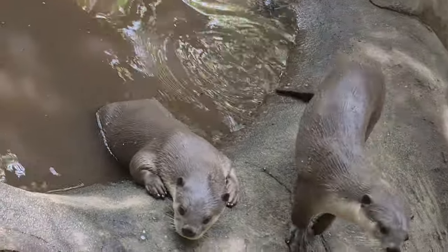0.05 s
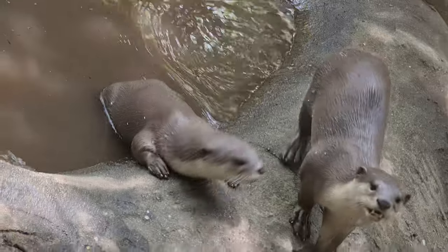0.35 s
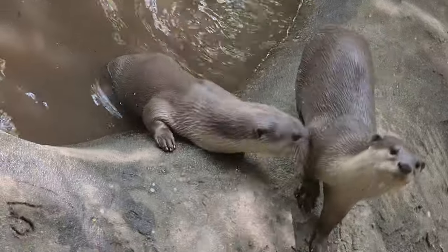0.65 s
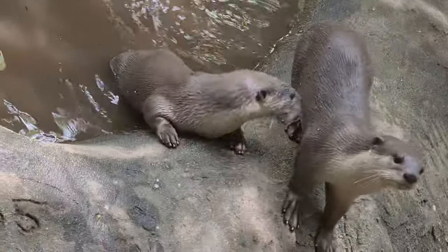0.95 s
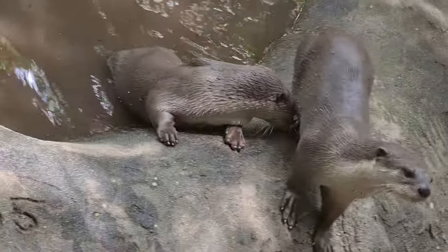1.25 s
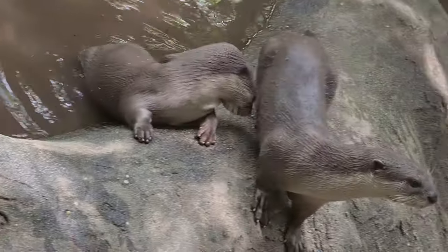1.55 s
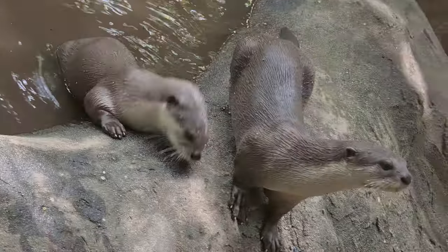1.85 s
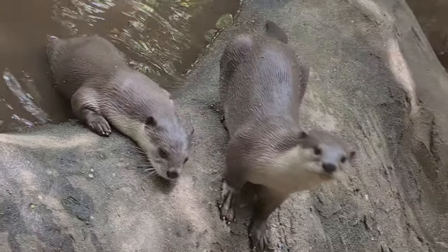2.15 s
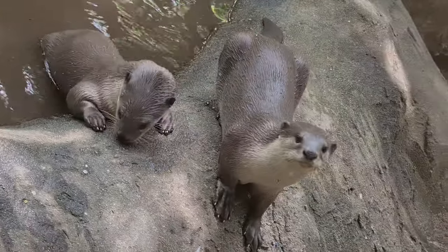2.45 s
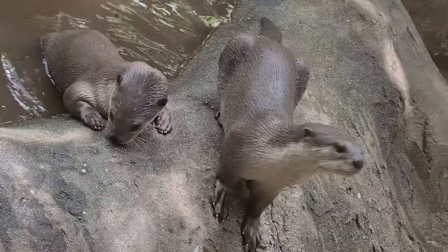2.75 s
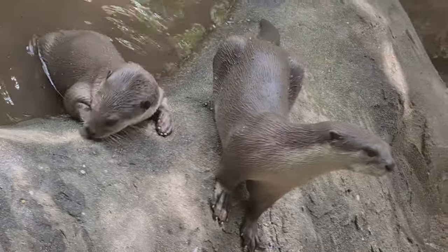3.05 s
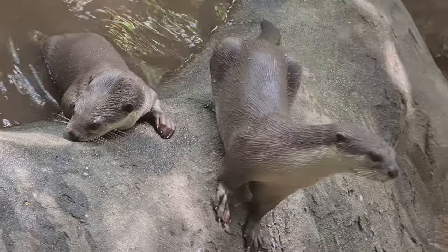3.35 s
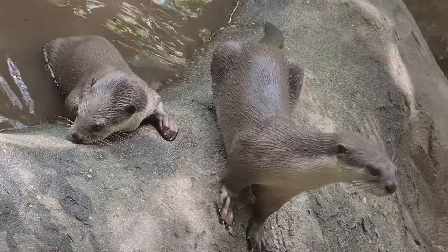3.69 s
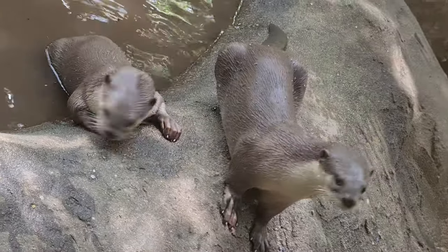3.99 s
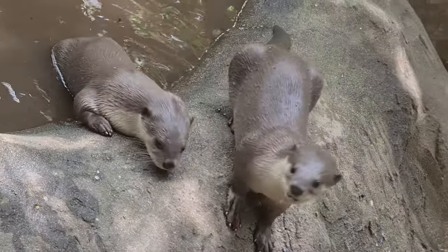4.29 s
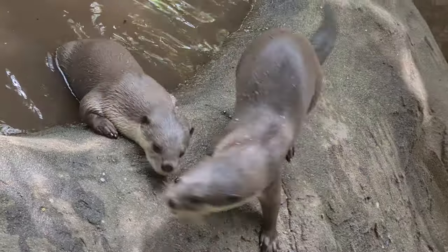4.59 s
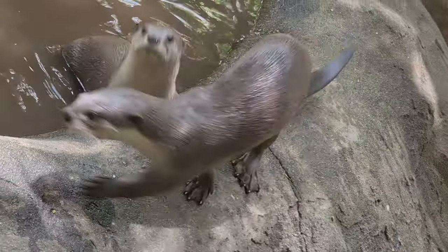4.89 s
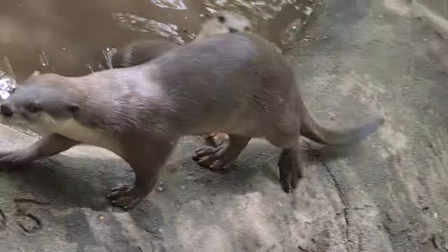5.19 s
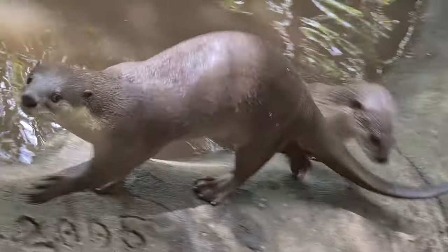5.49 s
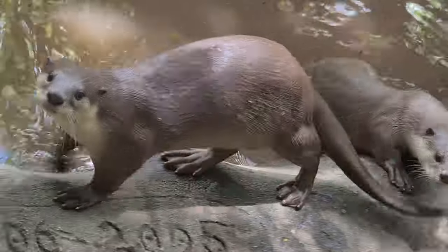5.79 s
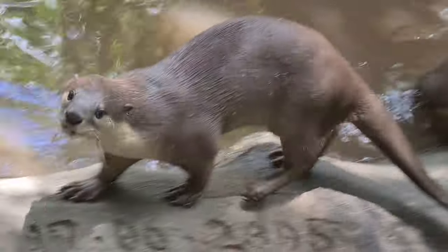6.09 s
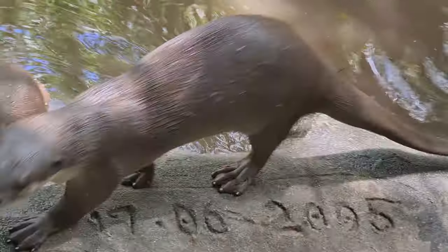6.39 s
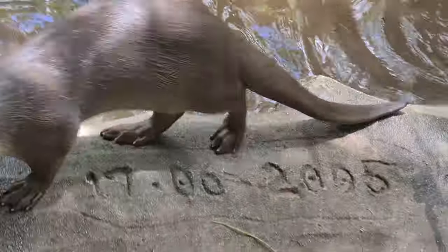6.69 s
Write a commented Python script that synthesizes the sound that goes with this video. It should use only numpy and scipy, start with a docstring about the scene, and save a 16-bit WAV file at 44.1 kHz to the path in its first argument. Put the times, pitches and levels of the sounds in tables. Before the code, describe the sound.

High, plunging otter chirps and brief squeaks come at intervals beside softly trickling water, with faint birds and paws padding on wet stone.

```python
"""Water trickles over a low hum; then, at the concrete pool edge, an otter whistles a high chirp that
plunges at the end. More chirps follow, with arched squeaks that flip register, short yips and faint
nasal-sounding whines. Paws pad on the wet stone and birds call farther off. A two-port microphone
stands close to the otters, and the walls of the enclosure ring briefly around it."""
import sys
import numpy as np
from scipy import signal
from scipy.fft import rfft, irfft
from scipy.io import wavfile
from scipy.ndimage import uniform_filter1d, minimum_filter1d

SR = 44100
rng = np.random.default_rng(int(sys.argv[2]) if len(sys.argv) > 2 else 0)


def generate_wav(sig):
    """Save sig (samples, or channels by samples) to the path in sys.argv[1] as 16-bit PCM at SR."""
    pcm = np.round(np.clip(np.atleast_2d(sig).T, -1, 1) * 32767).astype(np.int16)
    wavfile.write(sys.argv[1], SR, pcm)


N = 297234
EDGE_HZ = 15750  # top of the band


def amp(db):
    """Decibels to gain."""
    return 10 ** (np.asarray(db) / 20)


def unit(x):
    """Scales to rms 1."""
    return x / np.sqrt(np.mean(x ** 2) + 1e-20)


def ramp(x):
    """Holds a share between 0 and 1."""
    return np.clip(x, 0, 1)


def blend(a, b, share):
    """Moves from a to b as the share goes from 0 to 1."""
    return a + (b - a) * ramp(share)


def stages(*lengths):
    """Time through a call, and the progress 0-1 of each of its stages in turn."""
    t = np.arange(0, sum(lengths), 1 / SR)
    return t, [ramp((t - end) / length + 1) for end, length in zip(np.cumsum(lengths), lengths)]


def bins(count):
    """Frequencies of a spectrum of count samples."""
    return np.fft.rfftfreq(count, 1 / SR)


def read(points, hz):
    """Reads a spectrum on a log-frequency axis."""
    f, value = np.transpose(points)
    return np.interp(np.log(hz + 1), np.log(f), value)


def coloured(x, spectrum):
    """Filters a sound by a table of f/Hz, gain/dB."""
    return irfft(rfft(x) * amp(read(spectrum, bins(len(x)))), len(x))


def add(mix, s, sound):
    """Lays a sound into the mix at time s."""
    part = mix[..., max(round(s * SR), 0):][..., :sound.shape[-1]]
    part += sound[..., :part.shape[-1]]


def wobble(count, hz):
    """Smooth random motion of rms 1, up to about hz."""
    noise = rfft(rng.standard_normal(count + 8192))
    return unit(irfft(noise / (1 + (bins(count + 8192) / hz) ** 4)))[:count]


def phase(hz):
    """Running phase of a pitch curve."""
    return 2 * np.pi * np.cumsum(hz) / SR


def faded(x):
    """Softens both ends of a call."""
    return x * signal.windows.tukey(len(x), min(1, 180 / len(x)))


def slur(length, start_hz, end_hz, level_db, octave_db, jitter):
    """One short note that glides unsteadily between two pitches."""
    count = int(length * SR)
    turn = phase(np.geomspace(start_hz, end_hz, count) * (1 + jitter * wobble(count, 450)))
    tone = np.sin(turn) + amp(octave_db) * np.sin(2 * turn)
    return np.sqrt(2) * amp(level_db) * tone * signal.windows.tukey(count, .6)


def microphone(x, lag_s, pan_db):
    """The sound reaches the right port later than the left, and at another level."""
    late = irfft(rfft(x) * np.exp(-2j * np.pi * bins(len(x)) * lag_s), len(x))
    tilt = amp(pan_db)
    return np.array([x * tilt, late]) * np.sqrt(2 / (1 + tilt ** 2))


# Ring of the walls around the pool: f/Hz, t60/s
WALL_DECAY = [(200, 0.085), (1500, 0.19), (4000, 0.64), (7000, 0.5), (14000, 0.32)]
def enclosure(x, delay_s, build_s):
    """Sparse reflections set in after a delay, build up and die band by band."""
    t = np.arange(SR) / SR
    taps = rng.choice([-1., 1.], (2, SR)) * (rng.random((2, SR)) < .1)
    taps *= ramp((t - delay_s) / build_s)
    hz, s, spectra = signal.stft(taps, SR, nperseg=256)
    decay = amp(-60 * s / read(WALL_DECAY, hz)[:, None])
    tail = signal.istft(spectra * decay, SR, nperseg=256)[1]
    tail /= np.linalg.norm(tail, axis=1, keepdims=True)
    return signal.fftconvolve(x[None], tail, axes=1)[:, :N]


# Water and rumble all around the microphone: f/Hz, relative density/dB
WASH_SPECTRUM = [(15, -35), (25, 3), (119, -7.5), (221, -20), (274, -8.5), (421, -25.5), (598, -12),
                 (722, -27), (804, -18), (945, -22), (1800, -21), (4150, -30), (4500, -32), (5880, -37),
                 (15500, -42)]
# Their slow swell: t/s, rumble/dB, hiss/dB
WASH_SWELL = [(0, -3, 0.5), (1.001, -3, 4), (2.5, -4.5, 2.5), (4.002, -2, 1.5), (4.999, 4, 1),
              (5.599, 2.5, 0.5), (6.1, 3, 2.5), (6.74, 3, 2.5)]
# How alike they are at the two ports: f/Hz, likeness/0-1
PORT_LIKENESS = [(30, 1), (150, 0.1), (400, 0.7), (900, 0), (3000, 0), (15000, 0)]
# Their balance at the microphone: f/Hz, left-right/dB
WASH_BALANCE = [(30, -10), (70, 4), (150, -7), (500, 1), (1500, -4), (5000, -2), (15000, 3.5)]
def water_wash(level_db=-52.5, patch_db=3.8, rumble_hz=250):
    """A patchy hiss of water lies over a low rumble."""
    frames, hz = N // 512 + 5, bins(2048)
    left_re, left_im, apart_re, apart_im, patches = rng.standard_normal((frames, len(hz), 5)).T
    patches = unit(uniform_filter1d(uniform_filter1d(patches, 7, axis=1), 20, axis=0))
    likeness = read(PORT_LIKENESS, hz)[:, None]
    left = left_re + 1j * left_im
    right = likeness * left + np.sqrt(1 - likeness ** 2) * (apart_re + 1j * apart_im)
    spectra = np.array([left * amp(read(WASH_BALANCE, hz))[:, None], right])
    s, rumble_db, hiss_db = np.transpose(WASH_SWELL)
    t = np.arange(frames) * 512 / SR
    low = 1 / (1 + (hz[:, None] / rumble_hz) ** 2)
    swell_db = blend(np.interp(t, s, hiss_db), np.interp(t, s, rumble_db), low)
    spectra *= amp(read(WASH_SPECTRUM, hz)[:, None] + swell_db + patch_db * patches * (1 - .35 * low))
    return amp(level_db) * unit(signal.istft(spectra, nperseg=2048, noverlap=1536)[1][:, :N])


# Steady, wavering narrow bands of low hum in the background: f/Hz, width/Hz, level/dB
HUM_BANDS = [(51.3, 5, -66), (285.6, 66, -66), (563, 24, -75.5), (1165, 110, -76.5), (1780, 110, -75)]
def low_hum():
    """Each narrow band wavers in level and phase about its centre."""
    hum = np.zeros(N)
    for hz, width, level_db in HUM_BANDS:
        turn = phase(np.full(N, hz))
        band = wobble(N, width / 2) * np.sin(turn) + wobble(N, width / 2) * np.cos(turn)
        hum += amp(level_db) * band
    return microphone(hum, lag_s=.0001, pan_db=-2.5)


def trickle(level_db=-75, drops_per_pitch=20, ring_cycles=4):
    """Small drops ring briefly on the pool, scattered from left to right."""
    drops, t = np.zeros((2, N)), np.arange(1024) / SR
    for hz in np.geomspace(900, 12000, 16):
        when, softness, sides = rng.random((3, drops_per_pitch))
        drop = np.sin(2 * np.pi * hz * t) * np.exp(-t * hz / ring_cycles)
        for s, drop_db, side in zip(when * N / SR, -np.log(softness + .02), sides):
            add(drops, s, np.sqrt([[side], [1 - side]]) * amp(drop_db) * drop)
    return amp(level_db) * unit(drops)


# Partials of the loudest distant bird: f/Hz, gain/dB
CRY_SPECTRUM = [(1600, -11.5), (3200, 1), (5200, -4.5), (6400, -3), (8000, -23), (9600, -39), (11500, -36)]
# Its voice breaks into tones between the harmonics: t/s in the scene, gain of those tones/dB
CRY_SUBHARMONICS = [(3.426, -41), (3.452, 4.5), (3.48, 5), (3.53, 14)]
def bird_cry(at_s, length_s=.27, start_hz=5780, end_hz=3210, fall_s=.057, peak_s=.087):
    """A falling whistle whose every second cycle weakens near the end, adding subharmonics."""
    t = np.arange(0, length_s, 1 / SR)
    hz = blend(end_hz, start_hz, np.exp(-(t / fall_s) ** 1.6))
    level_db = -30 - np.maximum(80 * (peak_s - t), 237 * (t - peak_s))  # swell and fade in dB/s
    attack = ramp(t / .0055)
    between = amp(np.interp(at_s + t, *np.transpose(CRY_SUBHARMONICS)))
    hoarse = np.clip((hz - 3200) / 600, .15, 1)  # hoarse while falling, steadier at the bottom
    turn = phase(hz * (1 + .034 * hoarse * wobble(len(hz), 400)))
    k = np.arange(1, 8)[:, None]
    weight = amp(read(CRY_SPECTRUM, k * hz / 2)) * np.where(k % 2, between, 1) * (k * hz / 2 < EDGE_HZ)
    tone = (weight * np.sin(k * turn / 2)).sum(0)
    return faded(np.sqrt(2) * amp(level_db) * attack * tone)


# Thin notes, mostly distant birds. The one at 0.988 s is a 5.6 kHz ring at the top of the first squeak,
# the one at 6.384 s a brief 3.4 kHz undertone in the otter's last whistle:
# t/s, length/s, start f/Hz, end f/Hz, level/dB, roughness
THIN_NOTES = [(0.988, 0.029, 5580, 5530, -46, 0.11), (1.364, 0.12, 4414, 4470, -71.5, .05),
              (1.67, .031, 3940, 3930, -58.5, 0.03), (1.694, 0.094, 3600, 3190, -61.5, .2),
              (1.882, .21, 1792, 1960, -47.5, 0.57), (1.898, 0.21, 3240, 3630, -55.5, 0.37),
              (2.316, 0.055, 2670, 3390, -56.5, 0.5), (2.34, 0.066, 3620, 3560, -61.5, 0),
              (2.593, 0.095, 2330, 3640, -56.5, 0.11), (2.632, 0.049, 5280, 5630, -52, 0.23),
              (2.861, 0.036, 1890, 2096, -55.5, 0.1), (2.904, 0.073, 6620, 5570, -56, 0.2),
              (2.999, 0.13, 9800, 8800, -65, 0.16), (3.014, .13, 4700, 3780, -59.5, 0.29),
              (3.312, 0.0245, 1794, 1600, -44.5, .3), (3.991, 0.082, 5566, 5790, -45.5, 0.29),
              (4.036, 0.048, 5350, 3220, -48, 1.12), (5.26, 0.14, 8390, 6970, -55, 0.57),
              (5.323, 0.088, 6850, 5270, -48, 0.86), (5.441, 0.066, 4350, 3604, -57.5, 0.77),
              (6.384, 0.012, 3460, 3260, -52, 0.97)]
def birds_and_thin_notes(cry_at_s=3.348):
    """Faint glides and one cry reach the microphone more by their reflections than directly."""
    calls = np.zeros(N)
    for s, *note, rough in THIN_NOTES:
        add(calls, s, slur(*note, octave_db=-22, jitter=.078 * rough))
    add(calls, cry_at_s, bird_cry(cry_at_s))
    direct = amp(-.5) * microphone(calls, lag_s=.00023, pan_db=-.5)
    return direct + amp(2.5) * enclosure(calls, delay_s=.0018, build_s=.026)


# Left of the microphone, a short low pop at the peak of the first chirp (0.587 s), then paws on
# wet stone: t/s, thud level/dB, thud t60/s, tick level/dB
THUDS = [(.587, -23, 0.027, -48), (1.677, -49, 0.061, -47), (3.949, -54, 0.1, -67.5),
         (5.088, -51, .054, -76), (5.439, -44.5, 0.075, -49), (5.491, -35.5, 0.13, -38.5),
         (5.52, -37.5, 0.047, -49), (5.662, -48.5, 0.05, -66), (5.775, -65.5, 0.054, -52),
         (5.902, -56.5, .064, -62), (6.058, -65, .06, -52.5), (6.124, -56.5, .073, -61),
         (6.547, -55, .11, -45), (6.578, -66, 0.066, -51), (6.658, -52, 0.13, -46)]
# Colour of a thud: f/Hz, relative level/dB
THUD_SPECTRUM = [(30, -12), (90, 0), (220, 4.5), (400, 3), (600, -17), (1500, -16), (4000, -43),
                 (15000, -71.5)]
def pop_and_paws(knock_hz=340, knock_db=4):
    """Each is a soft knock and thud with a bright tick; under a paw the tick is water."""
    thuds, t = np.zeros(N), np.arange(8192) / SR
    knock = amp(knock_db) * np.sin(2 * np.pi * knock_hz * t) * np.exp(-t / .0013)
    for s, thud_db, t60, tick_db in THUDS:
        thud_noise, tick_noise = rng.standard_normal((2, len(t)))
        thud = 1.1 * unit(coloured(thud_noise, THUD_SPECTRUM)) * amp(-60 * t / t60)
        tick = tick_noise * np.exp(-t / .002)
        add(thuds, s, amp(thud_db) * (thud + knock) + amp(tick_db) * tick)
    direct = microphone(thuds, lag_s=.00022, pan_db=13)
    return direct + amp(-2.5) * enclosure(thuds, delay_s=.0088, build_s=.0037)


# Another otter, faint at the microphone: t/s, length/s, top f/Hz, droop/Hz, level/dB, swell/dB
WHINE_CALLS = [(4.44, 0.38, 296.8, 1.8, -63, 23), (6.108, 0.31, 307.2, 18.3, -59, 1.5),
               (6.649, 0.085, 302, 9, -67.5, 0)]
# Strength of the whine's harmonics as heard: f/Hz, gain/dB
WHINE_SPECTRUM = [(300, -1.5), (600, 2.5), (900, -23.5), (1200, 4.5), (1500, 1), (1800, -0.5), (2100, -26),
                  (2450, -26.5), (2750, -3), (3100, -12.5), (4200, -20)]
def whines(edge_db=8, jitter=.00081):
    """A faint nasal-sounding buzz follows a shallow arch of pitch and softens at both ends."""
    calls, k = np.zeros(N), np.arange(1, 14)[:, None]
    for s, length, top_hz, droop_hz, level_db, swell_db in WHINE_CALLS:
        along = np.linspace(-1, 1, int(length * SR))
        hz = top_hz - droop_hz * along ** 2
        envelope = amp(level_db + swell_db * along / 2 - edge_db * along ** 8)
        turn = phase(hz * (1 + jitter * wobble(len(hz), 40)))
        harmonics = np.sin(k * turn + 2 * np.pi * rng.random(k.shape))
        buzz = (amp(read(WHINE_SPECTRUM, k * hz)) * harmonics).sum(0)
        add(calls, s, faded(envelope * buzz))
    return calls


# Yips close by, most just before or after a whistle: t/s, length/s, start f/Hz, end f/Hz, level/dB
YIP_CALLS = [(.413, .016, 1325, 1640, -44.5), (0.602, 0.008, 3010, 1400, -41.5),
             (1.691, 0.025, 564, 950, -52), (1.843, 0.014, 1800, 1390, -40.5),
             (2.248, 0.0177, 2320, 1220, -56), (3.15, 0.04, 1060, 808, -44), (4.21, 0.032, 1006, 1730, -50),
             (4.699, .017, 1220, 1800, -31), (4.809, 0.017, 1810, 1476, -33.5),
             (4.836, .04, 1434, 2040, -47), (4.937, 0.04, 2030, 1220, -40.5),
             (5.403, 0.024, 1700, 1480, -39.5), (6.22, 0.023, 1165, 1745, -38.5),
             (6.335, 0.0096, 1026, 1000, -34)]
def yips():
    """Each yip is one short, low, slightly rough glide."""
    calls = np.zeros(N)
    for s, *note in YIP_CALLS:
        add(calls, s, slur(*note, octave_db=-24.5, jitter=.01936))
    return calls


# An otter's throat and mouth in a squeak: f/Hz, relative gain/dB
THROAT_RESPONSE = [(500, -6), (780, 6.5), (1150, -19.5), (1800, 1.5), (2300, -17), (2900, -24.5),
                   (4300, -6), (5400, 1), (6400, 0), (8500, -10), (9600, -3.5), (11000, -10.5),
                   (15000, -46)]
# The hoarse air in it: f/Hz, relative level/dB
RASP_SPECTRUM = [(800, -27), (1900, 13.5), (2700, -29), (3500, 4), (4300, 0), (5600, 3), (7000, 2),
                 (8200, -62), (10000, -14.5), (12500, -19), (15000, -29)]
def squeak_voice(hz, level_db, rough, jitter=.107, rasp_db=1):
    """Harmonics sweep through the throat; roughness trades them for hoarse air."""
    count, k = len(hz), np.arange(1, 13)[:, None]
    rough = ramp(rough)
    turn = phase(hz * (1 + jitter * rough * wobble(count, 600)))
    press = ramp((hz - 800) / 900)  # higher pitch is pressed harder, so it is brighter
    slope_db = 3.6 - 2.6 * press
    weight = amp(read(THROAT_RESPONSE, k * hz) - slope_db * k) * (k * hz < EDGE_HZ)
    weight /= np.sqrt((weight ** 2).sum(0) / 2)
    tone = np.sqrt(1 - rough ** 2) * (weight * np.sin(k * turn)).sum(0)
    rasp = unit(coloured(rng.standard_normal(count), RASP_SPECTRUM))
    rasp *= amp(rasp_db) * press * (.12 + rough)
    return faded(amp(level_db) * (tone + rasp))


def squeak(rise_s, top_s, fall_s, top_hz, rise_db, top_db, fall_db, top_rough, jump_s=.00393, dip_db=8.5):
    """The low voice climbs and roughens, flips to the high register, then drops back and clears."""
    t, (rise, top, fall) = stages(rise_s, top_s, fall_s)
    up, down = (t - rise_s) / jump_s, (t - rise_s - top_s) / jump_s
    arch, near_top = (2 * top - 1) ** 2, (1 - fall) ** 2

    def registers(before, during, after):
        """One value for each of the three stages, joined at the jumps."""
        return blend(blend(before, during, up), after, down)

    rise_hz, fall_hz = blend(726, 1395, rise ** 2.6), blend(643.3, 1950, near_top)
    hz = registers(rise_hz, top_hz * (1 - .0694 * arch), fall_hz)
    # the voice is weak next to each jump
    level_db = registers(rise_db - dip_db * rise ** 4, top_db - dip_db * arch, fall_db - dip_db * near_top)
    edges_db = 31 * np.exp(-np.minimum(t, t[-1] - t) / .0043)
    rough = registers(.49 * rise, top_rough, blend(.1, 1, near_top))
    flutter_db = 3 * rough * wobble(len(t), hz=135)  # the rough voice is broken and uneven
    return squeak_voice(hz, level_db - edges_db + flutter_db, rough)


# Squeaks close by: t/s, rise/s, top/s, fall/s, top f/Hz,
# rise level/dB, top level/dB, fall level/dB, roughness of the top/0-1
SQUEAK_CALLS = [(.951, .034, 0.022, .071, 2790, -35, -37.5, -38.5, 0.16),
                (2.433, 0.039, 0.035, 0.047, 2422, -36, -32.5, -35.5, 0.06),
                (4.819, 0.048, .025, 0.049, 3040, -33.5, -28.5, -31.5, 0)]
def squeaks():
    """Short arched cries at the pool edge."""
    calls = np.zeros(N)
    for s, *shape in SQUEAK_CALLS:
        add(calls, s, squeak(*shape))
    return calls


# What an otter's mouth lets out of a whistle: f/Hz, gain/dB
MOUTH_RESPONSE = [(1200, 21.5), (1800, 2.5), (2700, 19), (3700, 7.5), (8000, 4), (9000, 7), (15000, 1)]
def whistle_voice(hz, level_db, octave_db, flutter_db=2.58):
    """A nearly pure tone with its octave: a subharmonic shows at the top, and the plunge turns rough."""
    count = len(hz)
    slack, strain = ramp((6200 - hz) / 2000), ramp((hz - 6850) / 150)
    jitter = .00072 + .07 * slack
    turn = phase(hz * (1 + jitter * wobble(count, 680)))
    tone = amp(read(MOUTH_RESPONSE, hz)) * np.sin(turn)
    subharmonic = amp(-37) * strain * np.sin(turn / 2)
    fuzz = 1 + .05 * wobble(count, 1500)
    octave = amp(octave_db + read(MOUTH_RESPONSE, 2 * hz)) * np.sin(2 * turn) * fuzz
    air = (amp(-58) + amp(-19) * slack) * rng.standard_normal(count)
    envelope = np.sqrt(2) * amp(level_db + flutter_db * wobble(count, 110))
    return faded(envelope * (tone + subharmonic + octave + air))


SCOOP_HZ, SCOOP_S, CLIMB_HZ_PER_S, PLUNGE_END_HZ = 268.6, .012, 1100, 3768
FLARE_HZ, FLARE_WIDTH_HZ, FLARE_DB = 3850, 350, 10  # a loud plunge flares at a resonance of the mouth
SWAY_HZ, SWAY_DB = 6, 4.5  # the held tone sways in level, and a little between the ports
def chirp(hold_s, slide_s, plunge_s, crest_s, top_hz, sag_hz, break_hz,
          hold_db, swell_db, arch_db, slide_db, plunge_db, octave_db, pan_db):
    """A whistle scoops up, sags, slides down with a push and plunges: the voice and its balance."""
    t, (hold, slide, plunge) = stages(hold_s, slide_s, plunge_s)
    hz = top_hz - SCOOP_HZ * np.exp(-t / SCOOP_S) - CLIMB_HZ_PER_S * np.maximum(crest_s - t, 0)
    hz -= sag_hz * ramp((t - crest_s) / (hold_s - crest_s)) ** 1.6
    hz = blend(hz, break_hz, slide ** .5)  # the slide starts steeply
    hz *= (PLUNGE_END_HZ / break_hz) ** plunge
    pushed, spent = slide / .24, plunge / .36  # each stage reaches its own level early
    level_db = hold_db + swell_db * (hold - .5) - arch_db * (2 * hold - 1) ** 2
    level_db += SWAY_DB * wobble(len(t), SWAY_HZ)
    level_db = blend(level_db, slide_db - 7 * slide ** 2, pushed)
    level_db = blend(level_db, plunge_db - 14 * plunge ** 8, spent)
    loudness = ramp((hold_db + 24.5) / 8.5)
    level_db += FLARE_DB * loudness * np.exp(-((hz - FLARE_HZ) / FLARE_WIDTH_HZ) ** 2)
    level_db -= 30 * np.exp(-(t / .012) ** 2)  # soft attack
    level_db -= 3.5 * np.exp(-((t - hold_s) / .004) ** 2)  # the voice catches as the slide begins
    octave_db = blend(blend(octave_db, -25.5, pushed), -9, spent)  # pure slide, bright plunge
    balance_db = blend(pan_db - .5 * wobble(len(t), SWAY_HZ), 5.5, pushed)
    return whistle_voice(hz, level_db, octave_db), balance_db


# Chirps on the pool edge, close to the microphone; levels are before the mouth's gain:
# start t/s, slide t/s, plunge t/s, end t/s, time to the crest/s, top f/Hz, sag/Hz, break f/Hz,
# hold level/dB, swell/dB, arch/dB, slide level/dB, plunge level/dB, octave/dB,
# left-right/dB, lag of the right port/s
CHIRP_CALLS = [(0.46, 0.584, .594, .605, 0.057, 7060, 128.8, 5990, -19.5, -3.5, 4.5, -13.5, -34, -11, 9.5, .00049),
               (2.068, 2.169, 2.224, 2.248, 0.0077, 6900, 400, 6115, -38.5, 19, -2, -25.5, -39, -32, -6, .000518),
               (3.176, 3.233, 3.252, 3.285, 0.023, 7580, 367, 6410, -47, -17, -15, -33, -44.5, -31, 15, 0.00038),
               (4.268, 4.412, 4.461, 4.483, 0.025, 6915, 168.7, 6234, -32, 2, -8.5, -10.5, -41, -16, 7.5, .000512),
               (4.715, 4.762, 4.775, 4.797, 0.017, 7160, 199, 6220, -43.5, 6, -3, -39, -54, -22, 9, .00052),
               (4.763, 4.827, 4.881, 4.903, 0.0047, 6810, 133.5, 6100, -23, 0, 8.5, -18, -50, -11, 8.5, .000405),
               (4.859, 4.892, 4.906, 4.933, 0.0037, 6340, 200, 5720, -33.5, 6, 9, -23.5, -46.5, -31, -10, 0.000463),
               (5.22, 5.316, 5.355, 5.385, 0.056, 6930, 299, 6360, -44.5, 6, 3.5, -44, -70.5, -31.5, 11, .00047),
               (6.258, 6.416, 6.448, 6.472, 0.072, 7160, 270.2, 5934, -16.5, 12, 12.5, -11.5, -34.5, -10.5, -0.5, 0.0004)]
def chirps():
    """Each chirp arrives from its own direction: the sound at the ports, and the bare voices."""
    direct, voices = np.zeros((2, N)), np.zeros(N)
    for s, slide_at, plunge_at, end, *shape, lag_s in CHIRP_CALLS:
        voice, pan_db = chirp(slide_at - s, plunge_at - slide_at, end - plunge_at, *shape)
        add(direct, s, microphone(voice, lag_s, pan_db))
        add(voices, s, voice)
    return direct, voices


# How strongly the otters' calls carry from the pool edge to the walls: f/Hz, gain/dB
CARRY_TO_WALLS = [(300, -5.5), (1500, -2), (3000, -0.5), (5000, -5.5), (7000, -5.5), (9000, -11.5),
                  (13000, -2.5)]
def otters():
    """The calls reach the close microphone first, then come back from the walls."""
    direct, whistles = chirps()
    low_calls = squeaks() + whines() + yips()
    direct += microphone(low_calls, lag_s=.0004803, pan_db=-1)
    outward = coloured(amp(-11.5) * whistles + amp(-4) * low_calls, CARRY_TO_WALLS)
    return direct + enclosure(outward, delay_s=.0049, build_s=.00059)


def scene():
    """Everything the microphone hears from the pool edge."""
    return otters() + birds_and_thin_notes() + pop_and_paws() + water_wash() + low_hum() + trickle()


def record(dry, ceiling=.97):
    """A fast limiter holds the loudest whistles under full scale; then the band limit."""
    allowed = ceiling / np.maximum(abs(dry).max(0), ceiling)
    gain = uniform_filter1d(minimum_filter1d(allowed, size=129), size=129)
    lowpass = signal.firwin(511, EDGE_HZ, window=("kaiser", 9), fs=SR)
    return signal.oaconvolve(dry * gain, lowpass[None], "same")


dry = scene()
out = record(dry)
generate_wav(out)
```